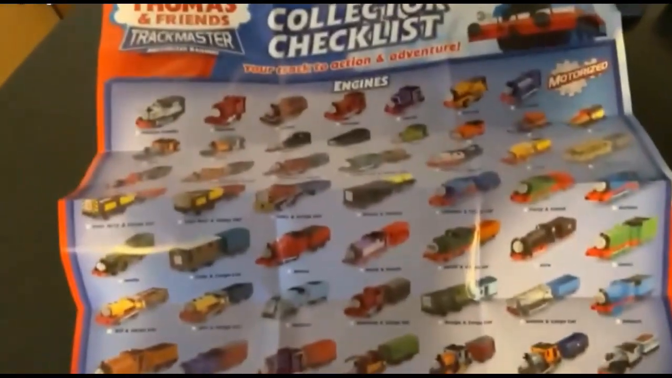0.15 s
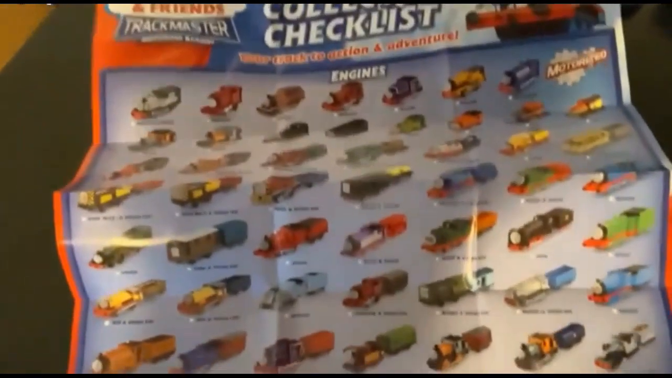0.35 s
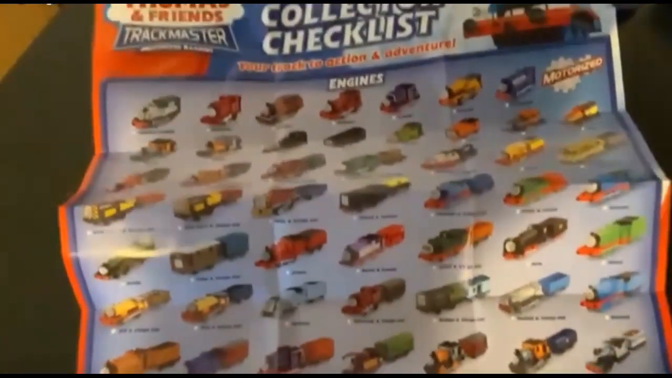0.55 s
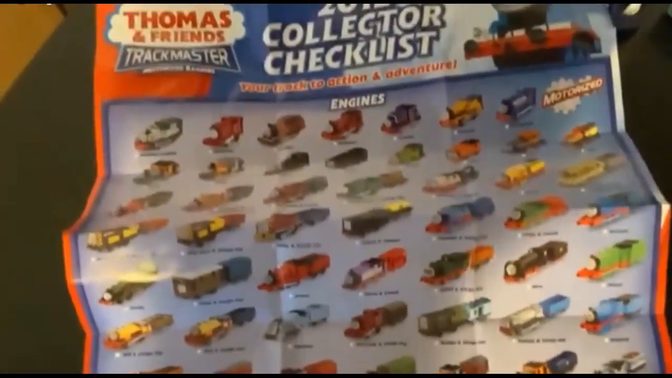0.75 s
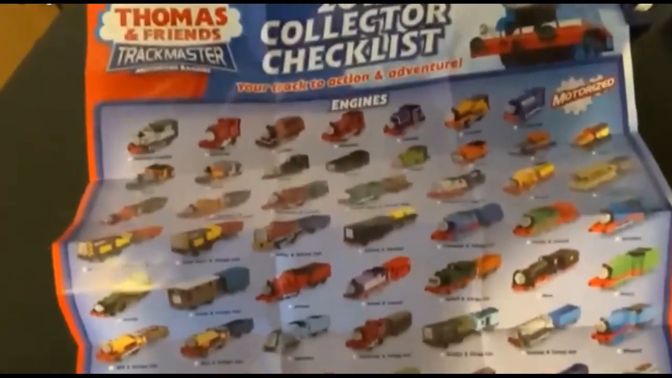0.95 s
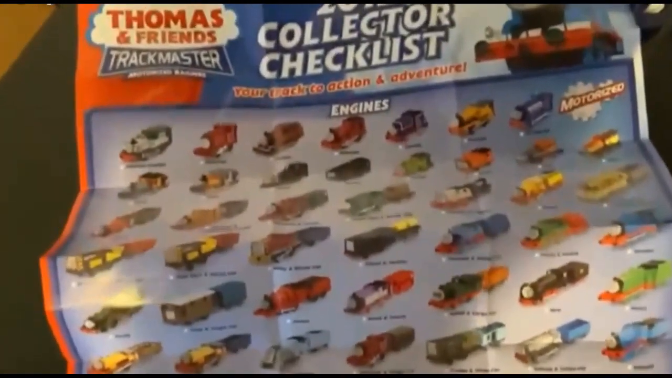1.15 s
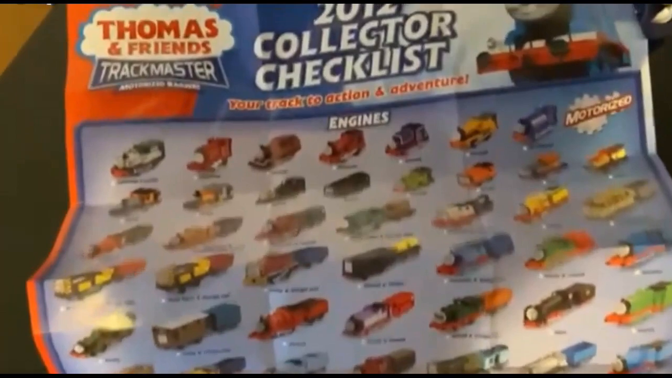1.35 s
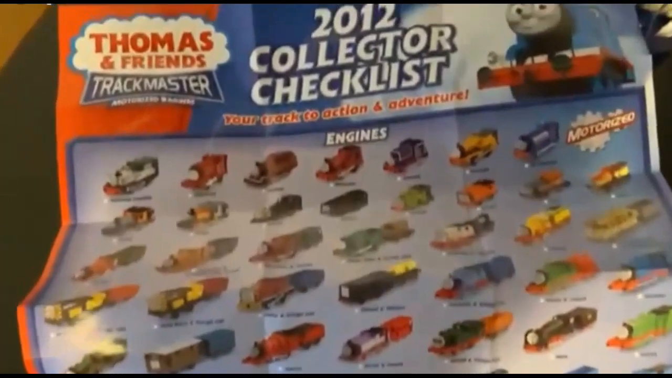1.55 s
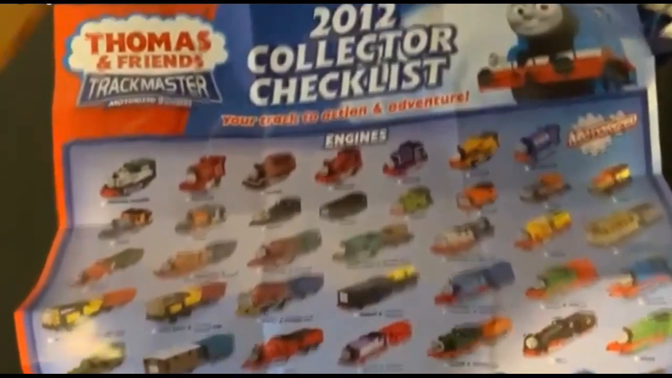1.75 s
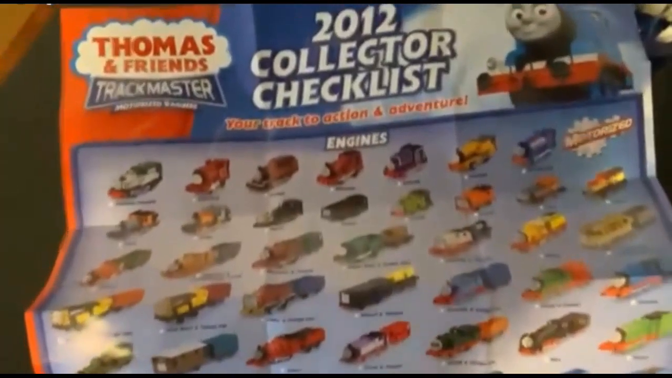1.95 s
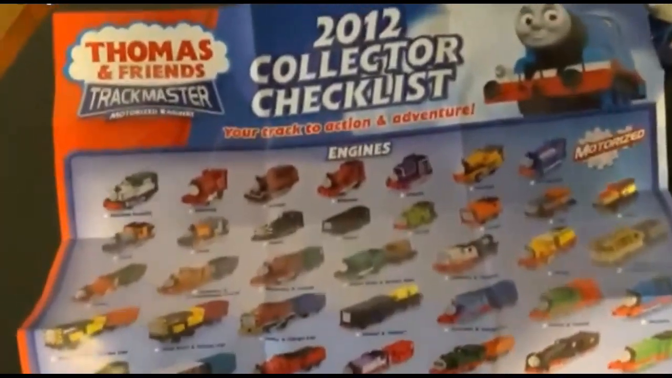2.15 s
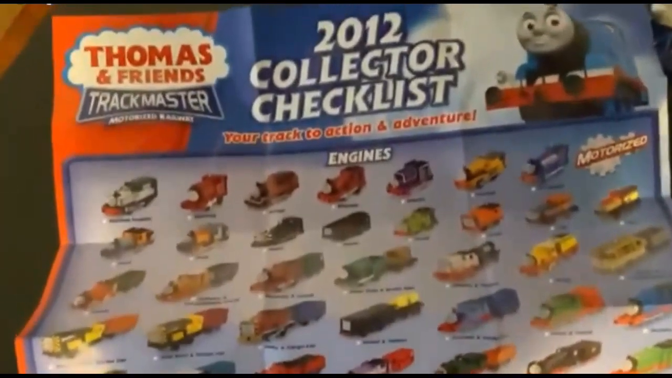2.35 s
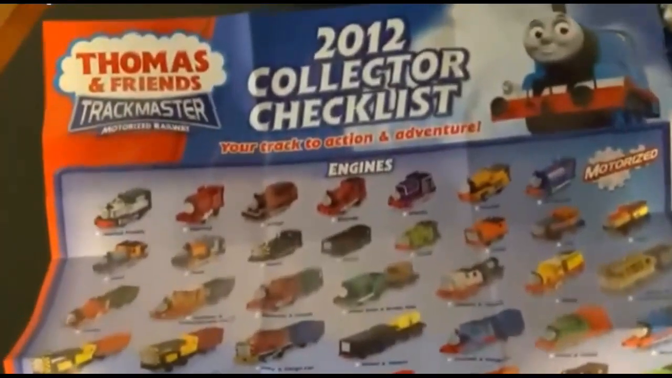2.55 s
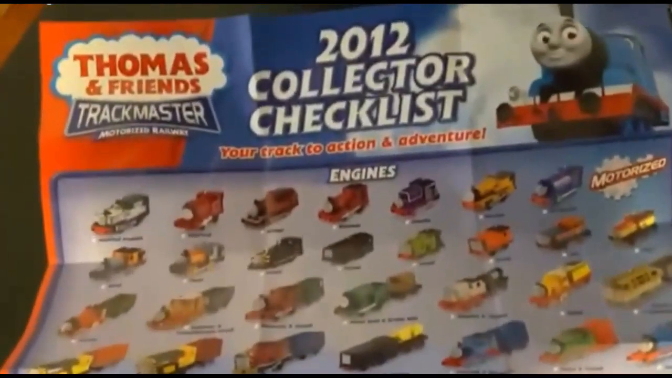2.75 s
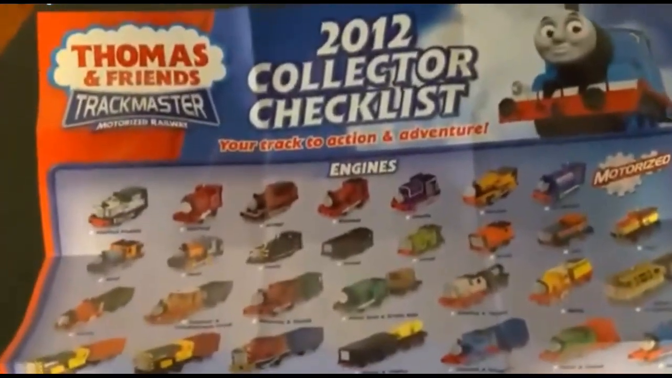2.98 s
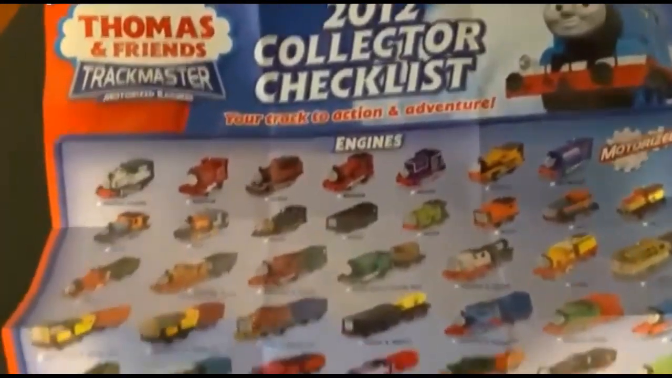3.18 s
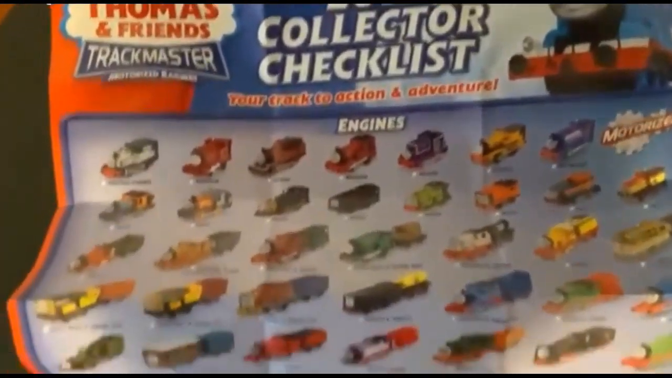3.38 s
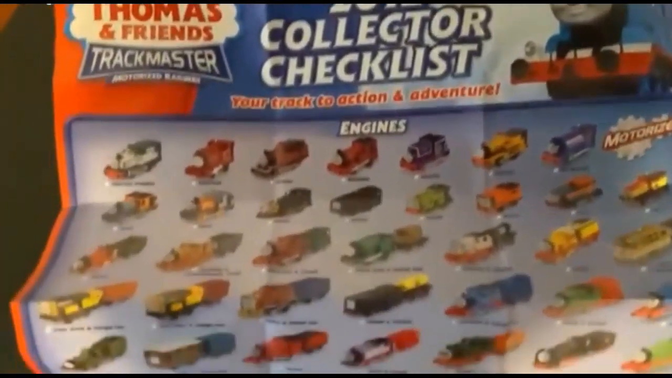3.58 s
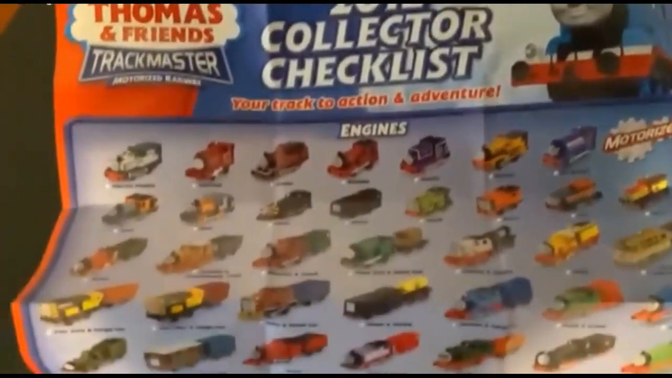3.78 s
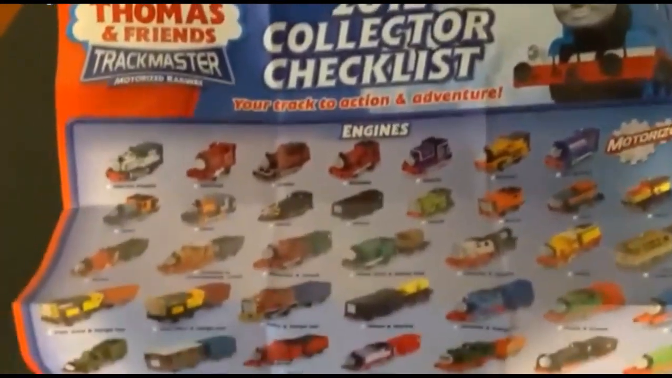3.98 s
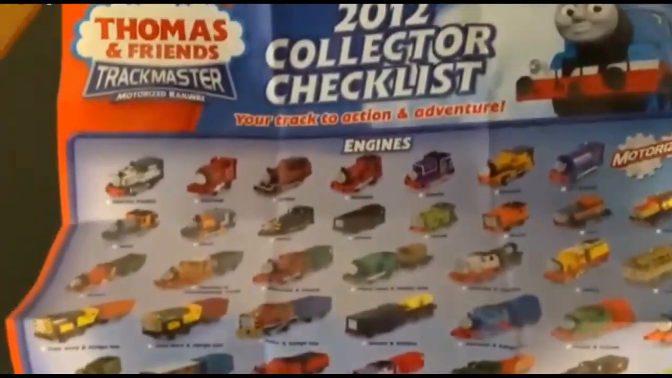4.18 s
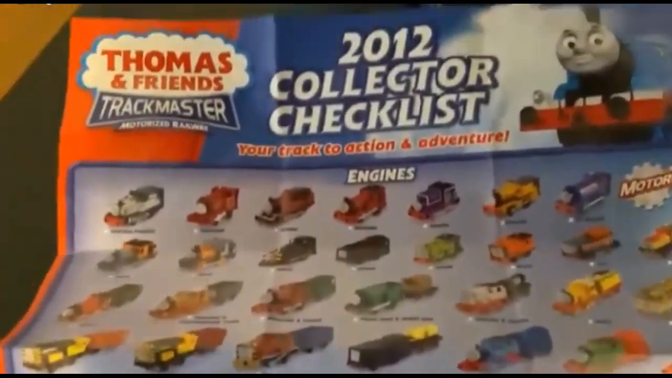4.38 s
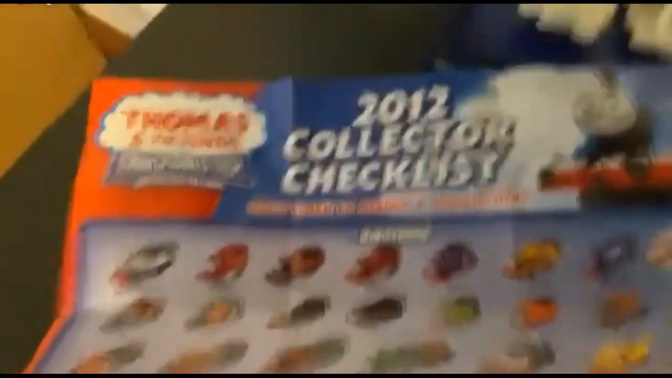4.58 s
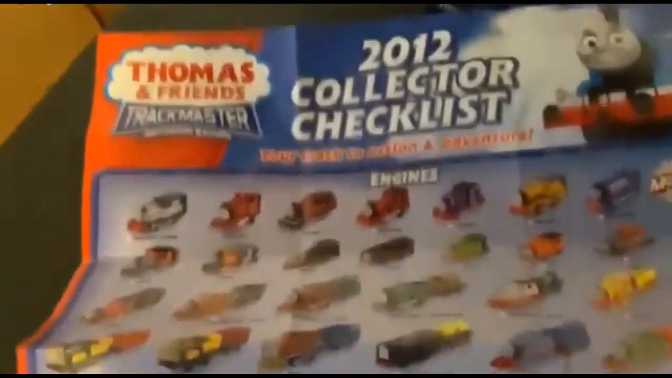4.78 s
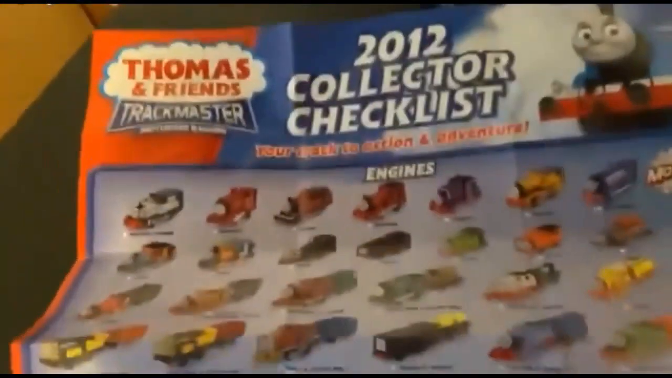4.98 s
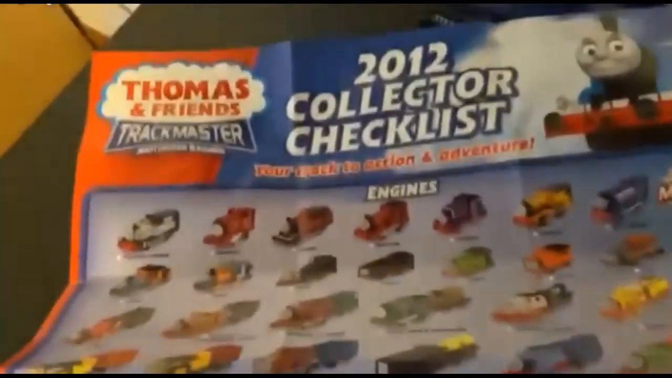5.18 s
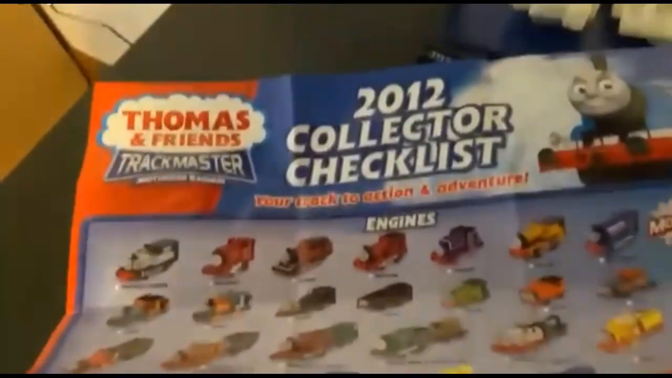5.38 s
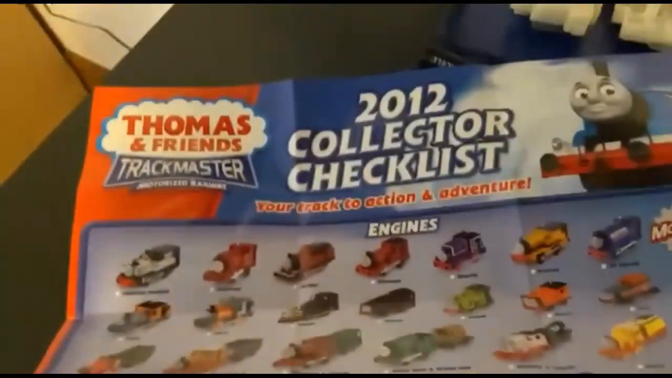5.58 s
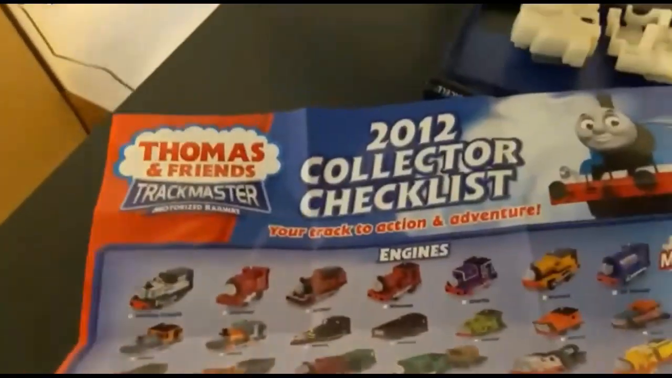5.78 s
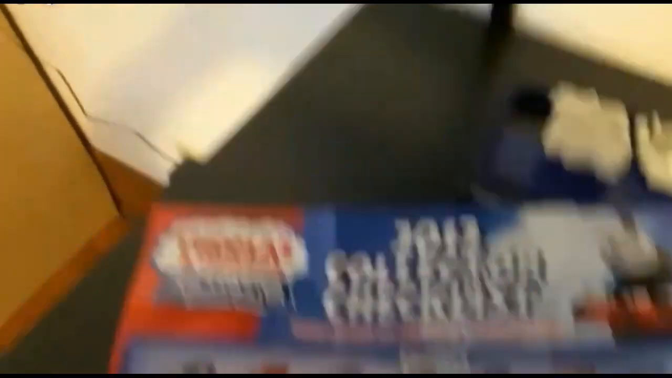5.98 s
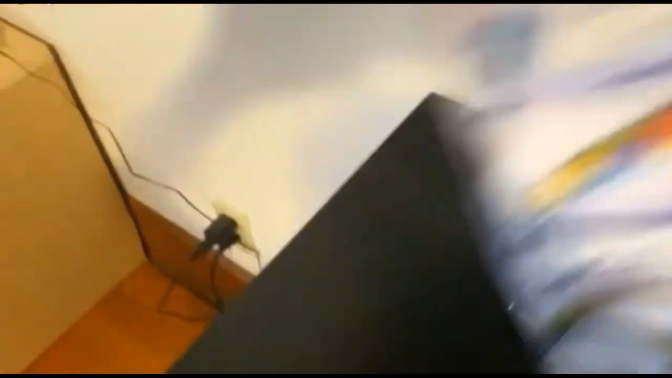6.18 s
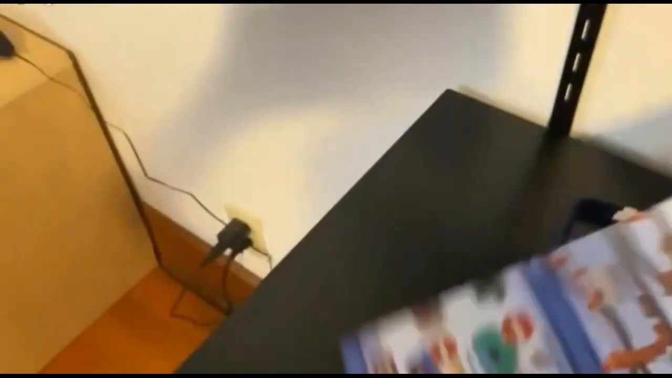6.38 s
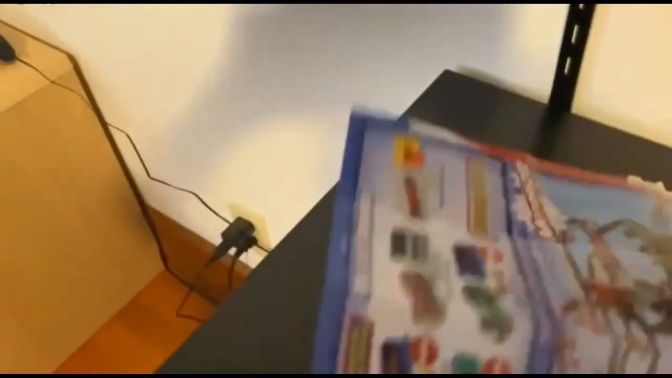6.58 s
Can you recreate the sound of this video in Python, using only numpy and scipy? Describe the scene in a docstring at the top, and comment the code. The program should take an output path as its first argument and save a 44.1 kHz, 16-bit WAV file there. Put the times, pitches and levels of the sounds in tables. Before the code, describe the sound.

Close in a quiet room, a large folded glossy sheet barely stirs: soft low thumps with quick falling pitch over faint hush and hand rumble. Two stronger flops come before the middle. After a few light ticks, the sheet is pulled off and turned over in a loud rush of snaps, crackle, hiss and flapping, still rustling at the end. Handheld microphone, slightly lively small room.

```python
"""A large glossy paper leaflet flops, snaps and crinkles close to a hand-held camera in a quiet room.
Each fold that flops over sends a bending wave across the sheet, heard as a quick falling sweep.
Later the sheet is pulled away and turned: creases snap and ring as bursts of filtered noise, small buckles
ring as short damped tones, and crinkling, sliding and flapping are coloured noises that swell and fade.
A soft room hush and the rumble of the hand on the camera lie below; the level dips once, briefly."""
import sys
import numpy as np
from scipy import signal
from scipy.fft import rfft, irfft, next_fast_len
from scipy.io import wavfile
from scipy.ndimage import uniform_filter1d, map_coordinates

SR = 44100
rng = np.random.default_rng(int(sys.argv[2]) if len(sys.argv) > 2 else 0)


def transcribe(signal):
    """Save signal, clipped to [-1, 1], as a 16-bit WAV file at the path in sys.argv[1]."""
    frames = np.atleast_2d(signal).T
    limited = np.clip(frames, -1, 1)
    pcm = np.round(limited * 32767).astype(np.int16)
    wavfile.write(sys.argv[1], SR, pcm)


N = 292824  # length in samples


def amp(db):
    """Turn decibels into a gain."""
    return np.exp(np.asarray(db) * (np.log(10) / 20))


def unit(x):
    """Scale x to an rms (average strength) of 1."""
    return x / np.sqrt(np.mean(x ** 2) + 1e-20)


def along(points, hz):
    """Read a curve of (Hz, value) points at any frequency, on a log frequency axis."""
    point_hz, value = np.transpose(points)
    return np.interp(np.log(hz + 1), np.log(point_hz + 1), value)


def curves(rows):
    """Give one value per sample for each column after the time; -120 outside the listed times."""
    time_s, *columns = np.transpose(rows)
    t = np.arange(N) / SR
    return [np.interp(t, time_s, column, left=-120, right=-120) for column in columns]


def wobble(rate):
    """A smooth random curve through `rate` random points a second."""
    points = rng.standard_normal(int(N * rate / SR) + 4)
    return map_coordinates(points, [np.arange(N) * rate / SR])


def filtered(x, response):
    """Filter x: multiply its spectrum by a response that depends on frequency."""
    size = next_fast_len(N + SR // 2)
    spectrum = rfft(x, size) * response(np.fft.rfftfreq(size, 1 / SR))
    return irfft(spectrum, size)[..., :N]


def rush(spectrum, alike, patchy_db):
    """Stereo noise of rms 1 with a colour, a left-right likeness and patches of random gain."""
    z = signal.stft(rng.standard_normal((2, N)), nperseg=256)[2]
    # Random gains, smoothed over neighbouring frequencies and then times
    patches = uniform_filter1d(rng.standard_normal(z.shape[1:]), size=4, axis=0)
    patches = uniform_filter1d(patches, size=12, axis=1)
    pair = signal.istft(z * amp(patchy_db * unit(patches)), nperseg=256)[1][:, :N]

    def mid_side_gains(hz):
        angle = np.arccos(np.clip(along(alike, hz), -1, 1)) / 2  # more side makes the ears less alike
        return amp(along(spectrum, hz)) * [np.cos(angle), np.sin(angle)]

    mid, side = filtered(pair, mid_side_gains)
    return unit(np.array([mid + side, mid - side]))


def add(out, s, sound):
    """Mix a short sound in, starting at s seconds."""
    part = out[:, round(s * SR):][:, :sound.shape[-1]]
    part += sound[..., :part.shape[1]]


def background():
    """Lumpy low rumble from the hand on the camera, over the steady hush of room and microphone."""
    # Rumble of the hand: time_s [s], level_db [dB]
    rumble_level = [(0, -27.5), (0.06, -41.5), (0.6, -36.5), (1.0, -41), (1.7, -44.5), (2.7, -48.5),
                    (3.1, -41.5), (3.55, -45), (4.2, -49.5), (4.45, -34), (4.6, -42.5), (4.9, -39.5),
                    (5.3, -46.5), (5.7, -32.5), (6.0, -49.5), (6.25, -30.5), (6.45, -44), (6.64, -35)]
    # Colour of the rumble: pitch_hz [Hz], level_db [dB per Hz, relative]
    rumble_colour = [(12, -38), (20, -6), (44, 0.5), (69, 2), (179, -9), (259, -10.5), (335, -19.5),
                     (451, -37), (600, -25), (780, -50), (1320, -120)]
    # Colour of room tone and microphone hiss: pitch_hz [Hz], level_db [dB per Hz, relative]
    hush_colour = [(150, -27), (245, -0.5), (300, -10), (600, -16.5), (1200, -22), (2400, -26.5),
                   (7100, -31.5), (13000, -40.5), (14300, -39), (14800, -70)]
    # How alike left and right are: pitch_hz [Hz], likeness [1 = identical]
    likeness = [(60, 0.84), (180, 0.65), (550, 0.15), (1650, 0.19), (4970, 0.21), (15000, 0.28)]
    hush_db = -57
    lumps = amp(2.2 * wobble(16))
    rumble = unit(lumps * rush(rumble_colour, likeness, patchy_db=3.0))
    hush = rush(hush_colour, likeness, patchy_db=0.0)
    return amp(curves(rumble_level)[0]) * rumble + amp(hush_db) * hush


def slips():
    """Gains of crinkle, slide and top hiss as the sheet shifts in the hand: fast rise, hold, dying away."""
    # Slips: start_s [s], length_s [s], crinkle_db [dB], sliding_hiss_db [dB], thin_top_hiss_db [dB]
    slip_table = [(0.103, 0.024, -50, -71, -66), (0.838, 0.25, -59.5, -80, -93),
                  (2.994, 0.027, -49, -85, -90), (3.052, 0.12, -52, -74, -93),
                  (3.147, 0.061, -48.5, -66, -65), (3.248, 0.04, -54, -73, -90),
                  (4.369, 0.017, -54, -59.5, -61), (4.484, 0.012, -48.5, -63, -88),
                  (4.626, 0.023, -50, -55.5, -67), (4.847, 0.022, -51, -64, -76),
                  (4.912, 0.053, -47, -59.5, -61.5), (4.99, 0.012, -51, -66, -62),
                  (5.403, 0.018, -39, -68, -60), (6.466, 0.059, -23.5, -28, -43),
                  (6.559, 0.072, -32, -32.5, -44.5)]
    attack_s, release_db_per_s = 0.017, 313
    out, t = np.zeros((3, N)), np.arange(SR // 2) / SR
    for start_s, length_s, *levels_db in slip_table:
        rise = np.clip(t / attack_s, 0, 1) ** 2
        release = amp(-release_db_per_s * np.maximum(t - attack_s - length_s, 0))
        add(out, start_s - attack_s, amp(levels_db)[:, None] * rise * release)
    return out


def bursts(events, rise, crack_share, q, click):
    """Giving paper: a wide crack, fading in a share of the time, plus a patch ringing near its own pitch."""
    out, t = np.zeros((2, N)), np.arange(SR // 10) / SR
    f = np.fft.rfftfreq(len(t), 1 / SR)
    for start_s, level_db, ring_hz, crack_db, t60_s in events:
        noise = rng.standard_normal((2, len(t)))
        # One sample set to this many times the noise's strength gives a crisp click; 0 leaves it out
        noise[1, round(rise * SR)] = click
        ring_noise, crack_noise = rfft(noise)
        width = 1j * f * ring_hz / q
        resonance = (width / (ring_hz * ring_hz - f * f + width)) ** 2
        ring = unit(irfft(ring_noise * resonance, len(t)))
        crack = unit(irfft(crack_noise * f / (f + 1200) / (1 + (f / 6000) ** 3), len(t)))
        onset = 1 - np.exp(-(t / rise) ** 2)
        ring = ring * amp(-60 * t / t60_s) * onset
        crack = crack * amp(crack_db - 60 * t / (crack_share * t60_s)) * onset
        lag = rng.integers(-2, 3)  # samples between left and right
        ring_lag = round(lag * 6000 / ring_hz)  # low rings come from wider patches and lag more
        left = ring + crack
        right = np.roll(ring, ring_lag) + np.roll(crack, lag)
        add(out, start_s - 0.51 * rise, amp(level_db) / np.abs(left).max() * np.array([left, right]))
    return out


def snaps():
    """Creases snap, most with a sharp click at the start; the burst at 2.997 s is a soft scuff."""
    # Snaps: start_s [s], level_db [peak dB], ring_hz [Hz], crack_db [dB against the ring], t60_s [s to fade 60 dB]
    snap_table = [(0.1087, -41, 1880, -5, 0.01), (2.382, -31.5, 736, -8, 0.015),
                  (2.997, -36.5, 875, -33, 0.19), (3.1468, -23.5, 4600, -1.5, 0.015),
                  (4.275, -27.5, 1260, -6.5, 0.019), (4.2893, -26, 2160, 3, 0.012),
                  (4.3745, -42, 2360, -4, 0.028), (4.4907, -37, 840, -1, 0.017),
                  (4.8514, -41, 840, -4.5, 0.019), (4.909, -39, 2000, 3, 0.014),
                  (4.9591, -32, 840, -7, 0.033), (4.987, -28, 860, -8, 0.053),
                  (4.9925, -18.5, 1650, -13, 0.013), (5.4025, -19.5, 2070, -11, 0.021),
                  (5.4823, -13, 1350, -5.5, 0.02), (5.5193, -1, 3340, 7, 0.029),
                  (5.5287, -7.5, 2010, -4, 0.077), (5.629, -7.5, 2130, -7, 0.03),
                  (5.6345, -8, 1190, -17, 0.06), (5.6476, -3.5, 4000, 1, 0.041),
                  (5.6633, -0.5, 3080, 7, 0.063), (5.6935, -3, 1760, -1, 0.07),
                  (5.7582, -5, 3230, 13, 0.038), (5.7823, -2.5, 1250, -1, 0.05),
                  (5.7866, -5.5, 2220, -23, 0.043), (5.8265, -1, 1750, -23, 0.047),
                  (5.8444, -21, 1590, -19, 0.033), (5.911, -3.5, 1360, -9, 0.015),
                  (5.9148, -7, 1310, -8, 0.071), (5.9997, -2.5, 920, -5, 0.068),
                  (6.1197, -2, 4100, -20, 0.021), (6.1205, -8.5, 804, -34, 0.096),
                  (6.4034, -12, 790, -31, 0.026), (6.4645, -6.5, 875, 19, 0.02),
                  (6.4784, -1.5, 3360, -25, 0.029), (6.5004, -8.5, 2630, -31, 0.067),
                  (6.5262, -3.5, 917, -2.5, 0.06)]
    return bursts(snap_table, rise=0.00096, crack_share=0.72, q=1.8, click=7.0)


def flops():
    """High bending waves travel faster, so each flop falls in pitch; long folds swell later and last longer."""
    # Folds that flop over: start_s [s], level_db [dB], length [times an average fold]
    flop_table = [(0.11, -20, 1.26), (0.552, -23, 1.6), (0.584, -23.5, 1.45), (0.607, -25, 2.5),
                  (0.781, -23, 2.3), (1.222, -26, 1.84), (1.631, -25, 2.06), (2.382, -7, 1.04),
                  (3.1455, -0.5, 1.01), (3.1533, 0, 0.94), (4.275, -24, 0.34), (4.289, -17, 0.65),
                  (4.374, -18, 1.3), (4.429, -30.5, 0.42), (4.487, -30, 0.38), (4.668, -29, 0.6),
                  (4.732, -23, 2.4), (4.852, -27, 1.1), (4.958, -21.5, 1.33), (4.986, -13, 0.76)]
    rise_s, t60_s, fade_s = 0.006, 0.15, 0.0476  # for an average fold
    skew, rough = 0.32, 1.0  # radians: phase shift of each side, scatter
    out, t = np.zeros((2, N)), np.arange(1, SR // 4) / SR
    pitch_hz = 160 * (0.00995 / (t + 0.000616)) ** 1.01  # falls through 160 Hz after about 9 ms
    phase = 2 * np.pi * np.cumsum(pitch_hz) / SR + skew * np.array([[1], [-1]])
    drift = wobble(90)
    for start_s, level_db, length in flop_table:
        u = t / length
        swell = 1 - np.exp(-(u / rise_s) ** 2)
        fade = amp(-60 * u / t60_s) * np.exp(-(u / fade_s) ** 3)  # the lowest waves radiate nothing
        # Creases on the way scatter the later, slower waves
        scatter = rough * (t / fade_s) ** 2 * drift[round(start_s * SR):][:len(t)]
        add(out, start_s, amp(level_db) * swell * fade * np.sin(phase + scatter))
    return out


def crumples():
    """Patches of the sheet crumple, each in a short swell without a click."""
    # Crumples: start_s [s], level_db [peak dB], ring_hz [Hz], crack_db [dB against the ring]
    crumple_table = [(4.432, -41, 550, -33), (5.597, -12, 4730, -1), (5.815, -7, 1740, -30),
                     (5.956, -7, 1220, -30), (6.027, -7, 980, -14), (6.061, -9, 840, -11.5),
                     (6.218, -10, 460, -2), (6.237, -10.5, 690, -9), (6.303, -8.5, 610, -15),
                     (6.311, -10.5, 2090, -3), (6.38, -16, 820, -19), (6.536, -4, 905, -12)]
    t60_s = 0.061
    events = [(*row, t60_s) for row in crumple_table]
    return bursts(events, rise=0.012, crack_share=0.94, q=0.97, click=0)


def room(x):
    """The room's answer is noise in which each frequency dies at its own speed."""
    # Fading of the room: pitch_hz [Hz], t60_s [s to fade 60 dB]
    room_fade = [(200, 0.3), (12000, 0.11)]
    hz, t, z = signal.stft(rng.standard_normal((2, SR // 2)), SR, nperseg=256)
    fading = amp(-60 * t / along(room_fade, hz)[:, None])
    tail = signal.istft(z * fading, SR, nperseg=256)[1]
    late = np.pad(x, ((0, 0), (200, 0)))  # the answer starts 200 samples late
    return signal.fftconvolve(late, tail / np.linalg.norm(tail[0]), axes=1)[:, :N]


def grains(start, rate, centre_hz, octaves, cycles, spread_db):
    """Small buckles all over the sheet: short damped rings, each with its own pitch and left-right lag."""
    count = int(rate * (N / SR - start))
    when, lag, size, u, v = rng.random((count, 5)).T
    hz = np.clip(centre_hz * 2 ** (octaves * (u + v - 1)), 300, 9000)[:, None]
    k = np.arange(400)
    turns = hz * k / SR
    level = amp(-spread_db * np.log(size + 0.0069))[:, None]  # a few buckles are much louder
    ring = level * np.sin(2 * np.pi * turns) * np.exp(-turns / cycles) * (1 - k / len(k))
    at = (N - when * (N - start * SR)).astype(int)[:, None] + k
    lags = np.int_([16 * lag, 16 - 16 * lag])  # samples, for left and right
    return np.array([np.bincount((at + d[:, None]).ravel(), ring.ravel())[:N] for d in lags])


def flaps():
    """Gain of the whole sheet flapping: one lopsided swell for each flap."""
    # Flaps: peak_s [s], level_db [dB]
    flap_table = [(5.537, -21), (5.649, -21), (5.799, -22), (5.844, -19), (6.014, -24), (6.08, -22),
                  (6.229, -20.5), (6.312, -23.5), (6.523, -21.5)]
    rise_s, fall_s = 0.014, 0.027
    out, t = np.zeros((1, N)), np.arange(-SR // 10, SR // 4) / SR
    swell = np.exp(-np.where(t < 0, -t / rise_s, t / fall_s))
    for peak_s, level_db in flap_table:
        add(out, peak_s + t[0], amp(level_db) * swell)
    return out


def motion():
    """The bent sheet crinkles and flaps, and its glossy face hisses as it slides over fingers and shelf."""
    # Sheet pulled away and turned over: time_s [s], crinkle_db [dB], sliding_hiss_db [dB],
    # thin_top_hiss_db [dB], dull_share [0-1, part of the crinkle]
    turn_table = [(5.47, -40, -50, -54, 0), (5.49, -40.5, -36.5, -48, 0), (5.58, -38.5, -32.5, -38, 0),
                  (5.68, -26.5, -31, -34, 0), (5.74, -33.5, -33, -36, 0), (5.8, -25, -32.5, -47, 0),
                  (5.9, -28.5, -32, -44, 0.23), (5.985, -25.5, -39, -48, 0.9),
                  (6.02, -27.5, -28, -36.5, 0.05), (6.14, -30, -22.5, -29, 0.85),
                  (6.225, -22.5, -18.5, -23.5, 0.64), (6.3, -27, -29, -31.5, 1),
                  (6.36, -25.5, -41.5, -51, 0.68), (6.45, -41, -47, -55, 0.15)]
    # Colours of crinkle, sliding hiss, thin top hiss and flapping: pitch_hz [Hz], level_db [dB per Hz, relative]
    crinkle_colour = [(200, -4.5), (450, -1), (950, -5), (2600, -4), (8000, -38)]
    slide_colour = [(1500, -9.5), (2500, -6), (3300, 0.5), (6500, -0.5), (9500, -10.5), (14000, -61)]
    thin_colour = [(8000, -42), (10500, 1.5), (13000, 0.5), (16300, -8.5)]
    flutter_colour = [(50, -18), (110, 1.5), (230, 2.5), (420, -7), (900, -41)]
    # Colour laid on the crinkle when the held sheet stirs: pitch_hz [Hz], level_db [dB, relative]
    stir_colour = [(150, -12), (280, -1), (450, -16.5), (1400, -20), (3000, -33)]
    buckle_start_s = 5.4
    stir_db, settle_s = -51.5, 1.21  # the stirring gain is halved at settle_s

    *turn_db, dullness = curves(turn_table)
    crinkle, slide, thin = slips() + amp(turn_db)
    stir = amp(stir_db) / (1 + (np.arange(N) / SR / settle_s) ** 10)
    clumps = wobble(45)  # shared, so that crinkle and hisses swell together

    wash = rush(crinkle_colour, [(300, 0.33), (2000, 0.093)], patchy_db=5)
    rings = grains(start=buckle_start_s, rate=520, centre_hz=1990, octaves=1.91, cycles=3.0, spread_db=2.8)
    buckles = unit(amp(1.7 * clumps) * rings)
    bright = 1.34 * amp(3.5 * clumps) * wash + 0.63 * buckles
    dull = unit(filtered(wash, lambda hz: 1 / (1 + (hz / 1200) ** 3)))
    soft = unit(filtered(wash, lambda hz: amp(along(stir_colour, hz))))
    # A lightly bent sheet sounds dull
    force = np.clip(crinkle / amp(-39), 0, 1) ** 2 * (1 - np.clip(dullness, 0, 1))
    crinkling = crinkle * (force * bright + (1 - force) * dull)

    hiss_lumps = amp(1.5 * clumps + 0.83 * wobble(250))
    hiss = unit(hiss_lumps * rush(slide_colour, [(1500, 0.65)], patchy_db=4))
    top_lumps = amp(2.6 * clumps + 1.2 * wobble(310))
    top = unit(top_lumps * rush(thin_colour, [(9000, 0.47)], patchy_db=-2.0))
    flutter = unit(amp(1.3 * wobble(30)) * rush(flutter_colour, [(100, 0.8)], patchy_db=3.5))
    return crinkling + stir * soft + slide * hiss + thin * top + flaps() * flutter


def scene():
    """Mix all layers: creases answer in the room; the rest is too close or too soft to."""
    creases = snaps() + crumples()
    mix = creases + amp(-13.5) * room(creases) + flops() + motion() + background()
    return mix * amp([[-.3], [.3]])  # dB for left and right


def record(dry):
    """The level dips briefly, the loudest peaks are squeezed, and deep bass and the extreme top are cut."""
    # Brief dip: start_s [s], end_s [s]
    dip = (3.938, 3.9695)
    bass_hz, top_hz = 36, 16100
    t = np.arange(N) / SR
    x = dry * np.where((t > dip[0]) & (t < dip[1]), .01, 1)
    x = x / (1 + np.abs(x) ** 6) ** (1 / 6)  # bends only the loudest peaks
    return filtered(x, lambda hz: (hz < top_hz) / np.sqrt(1 + (bass_hz / (hz + 1)) ** 6))


dry = scene()
out = record(dry)
transcribe(out)
```